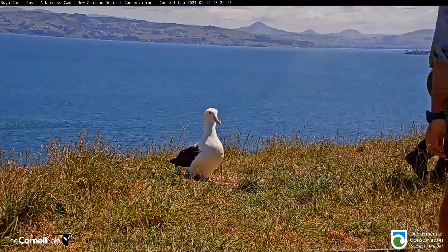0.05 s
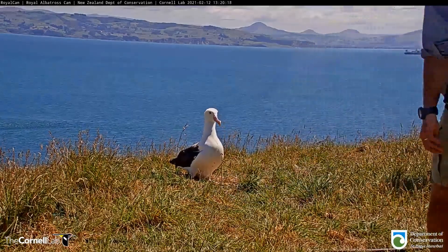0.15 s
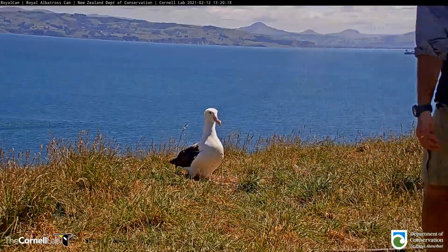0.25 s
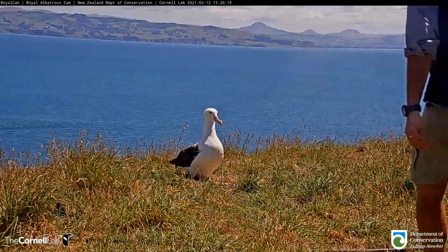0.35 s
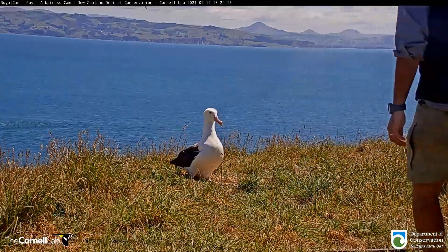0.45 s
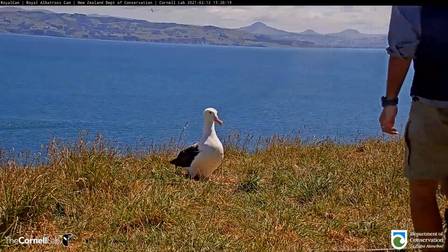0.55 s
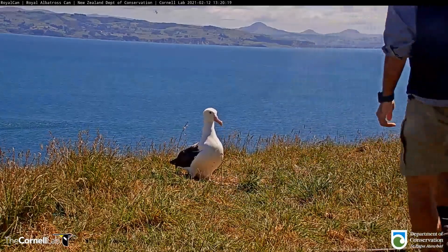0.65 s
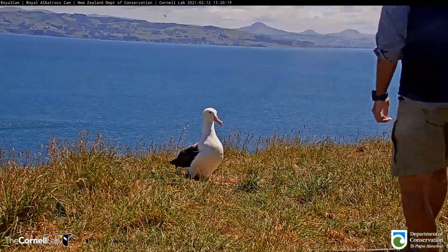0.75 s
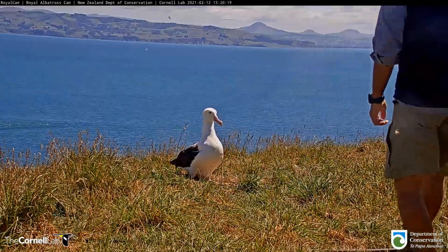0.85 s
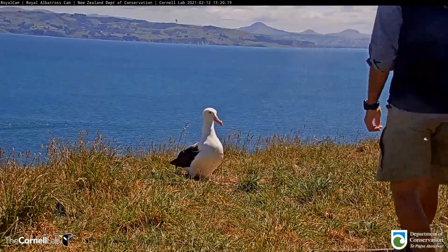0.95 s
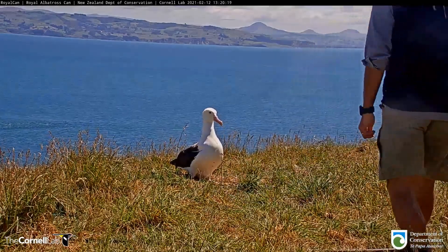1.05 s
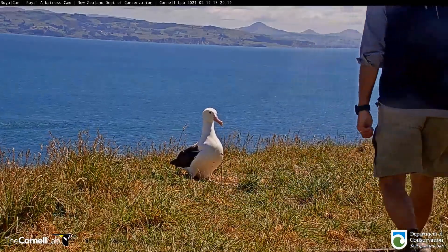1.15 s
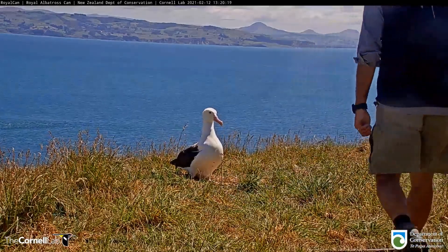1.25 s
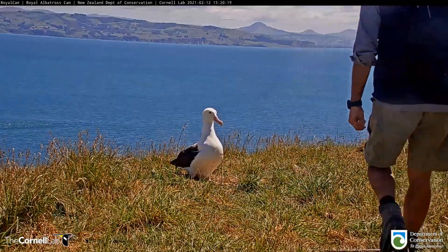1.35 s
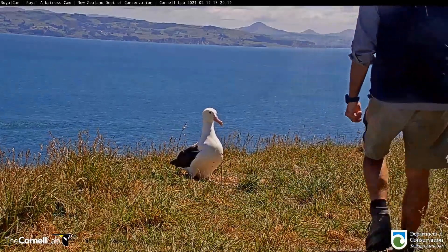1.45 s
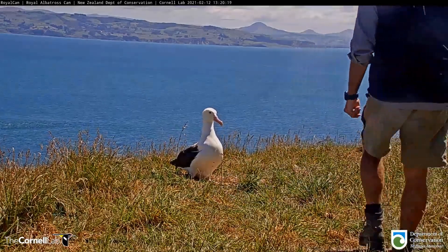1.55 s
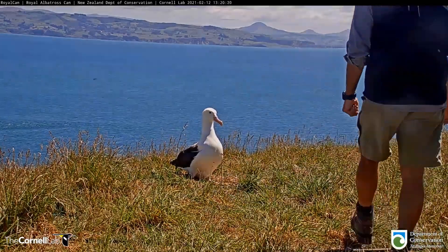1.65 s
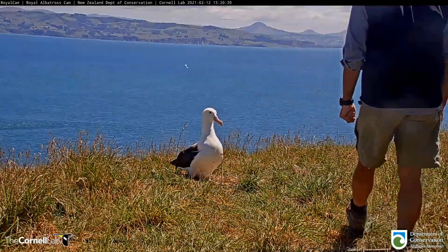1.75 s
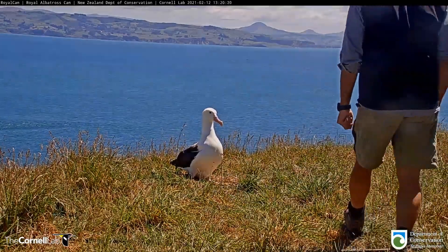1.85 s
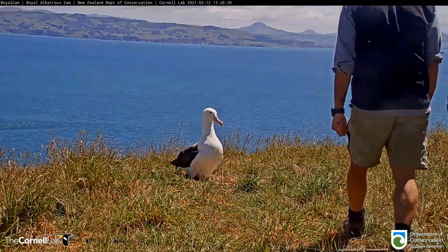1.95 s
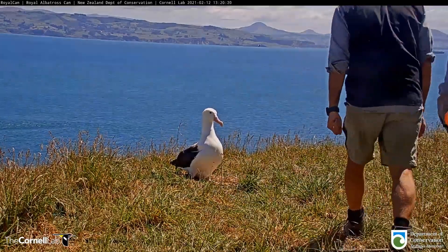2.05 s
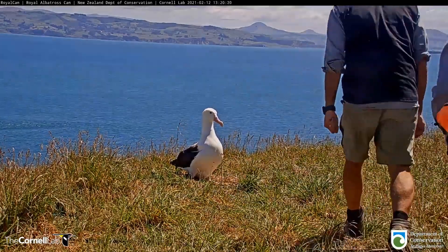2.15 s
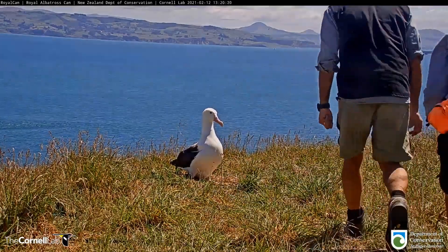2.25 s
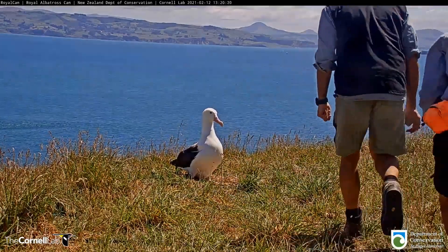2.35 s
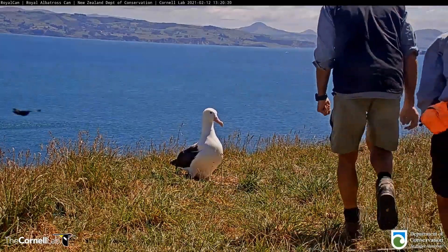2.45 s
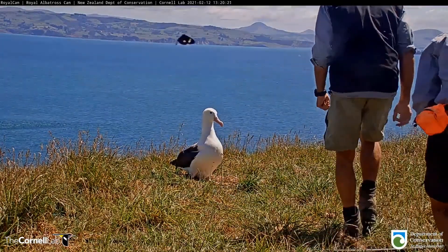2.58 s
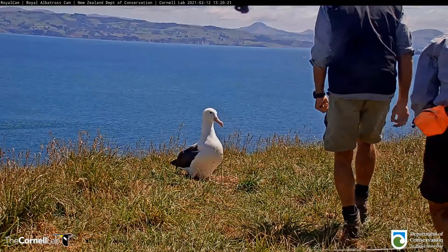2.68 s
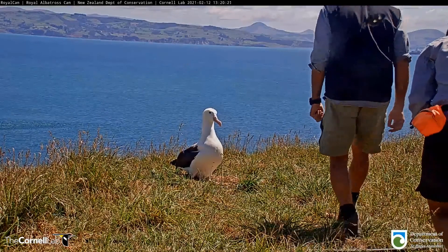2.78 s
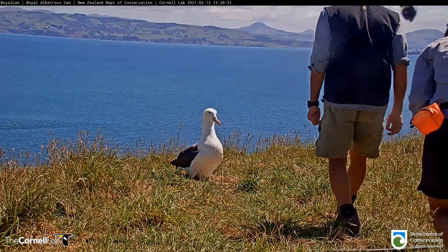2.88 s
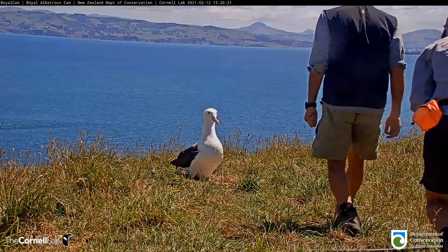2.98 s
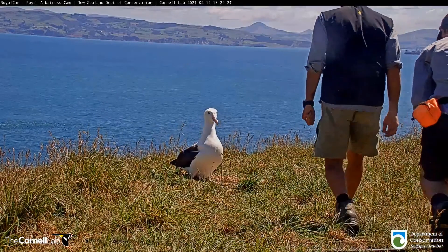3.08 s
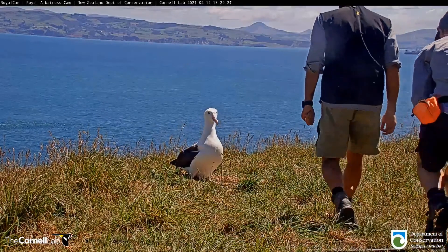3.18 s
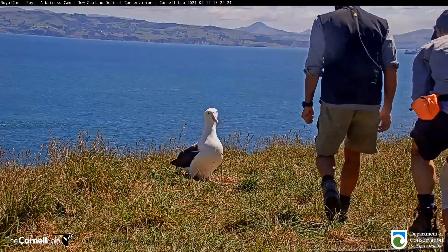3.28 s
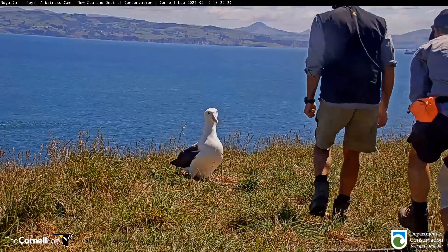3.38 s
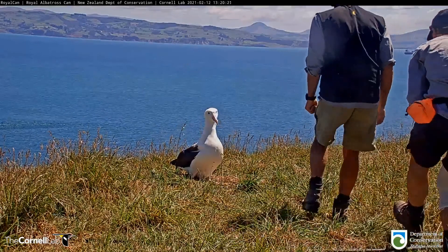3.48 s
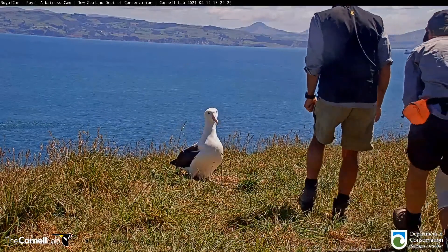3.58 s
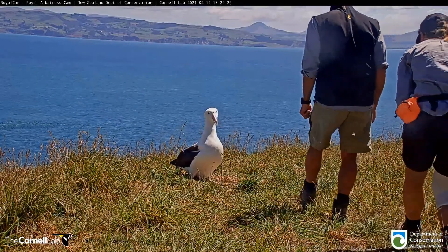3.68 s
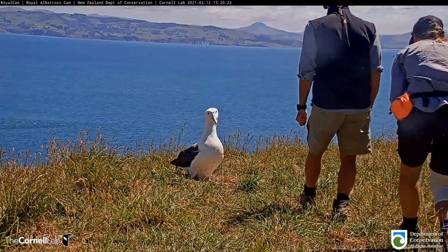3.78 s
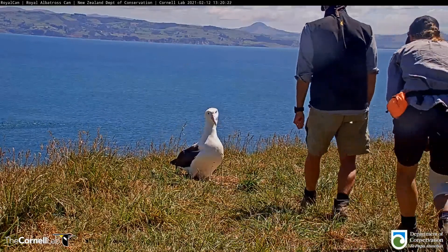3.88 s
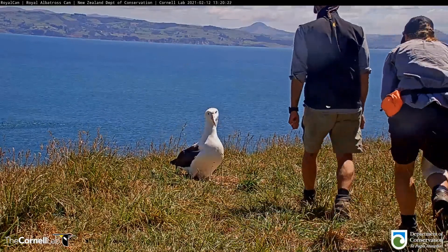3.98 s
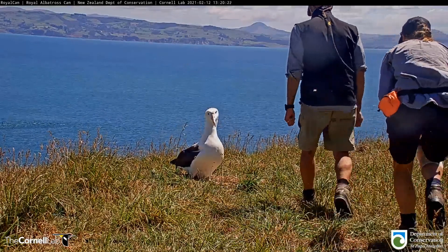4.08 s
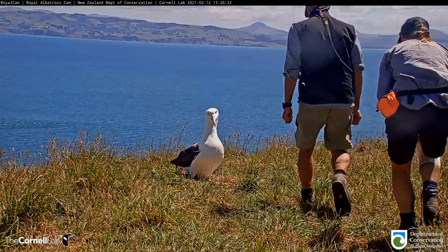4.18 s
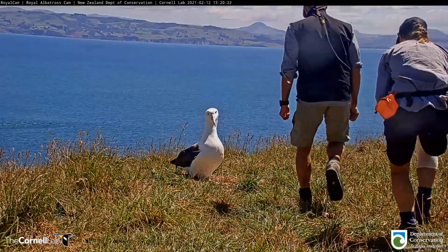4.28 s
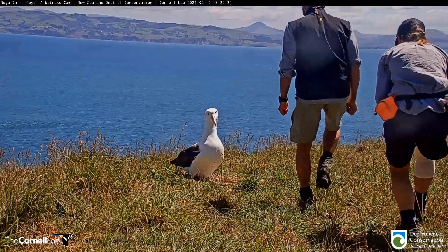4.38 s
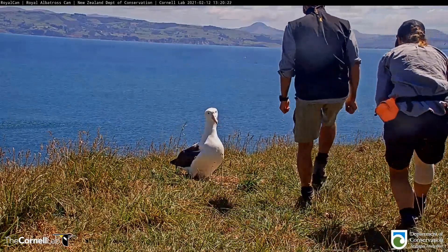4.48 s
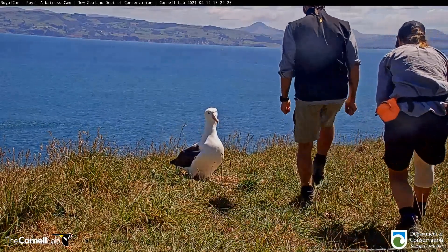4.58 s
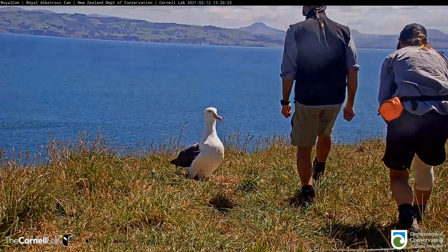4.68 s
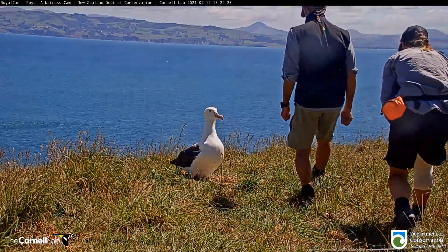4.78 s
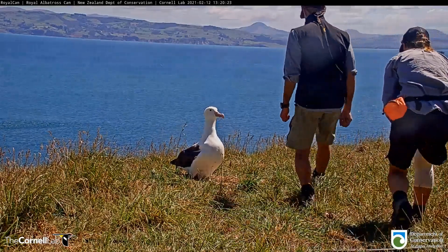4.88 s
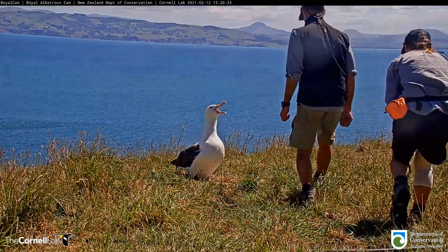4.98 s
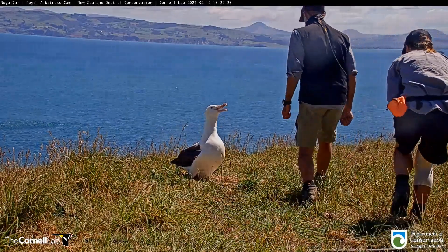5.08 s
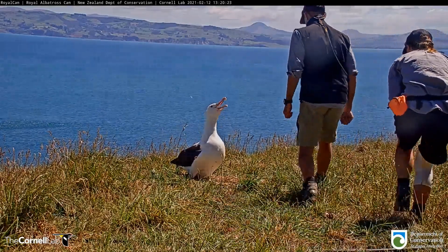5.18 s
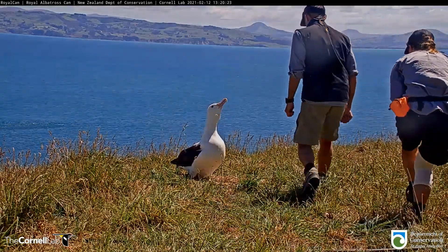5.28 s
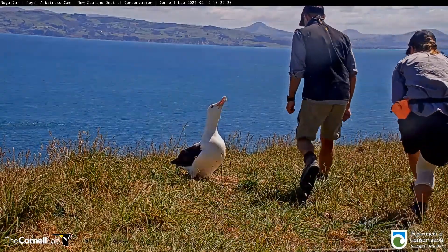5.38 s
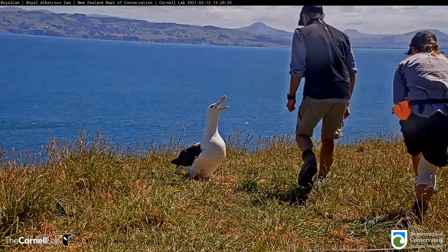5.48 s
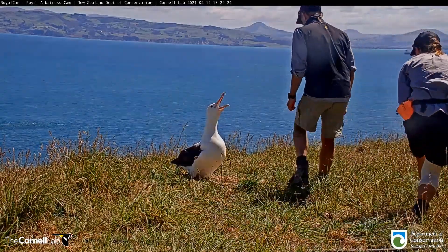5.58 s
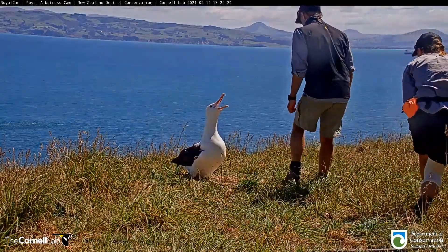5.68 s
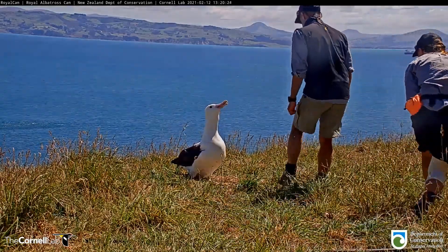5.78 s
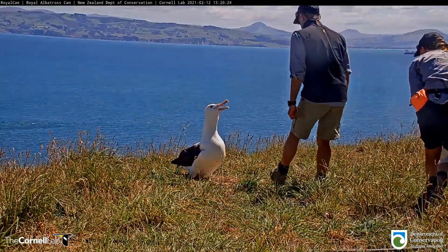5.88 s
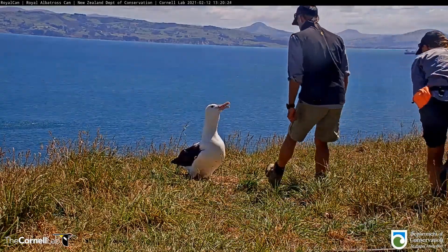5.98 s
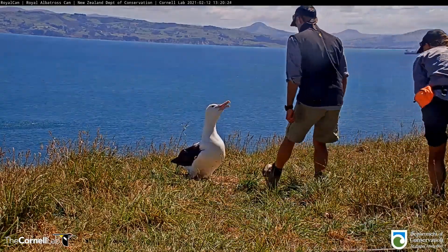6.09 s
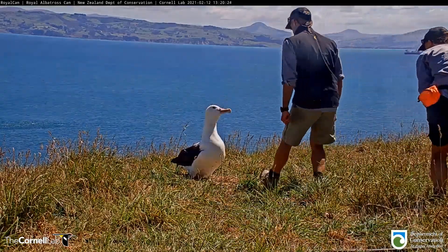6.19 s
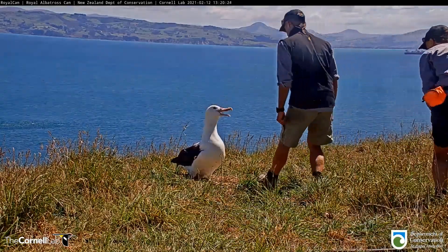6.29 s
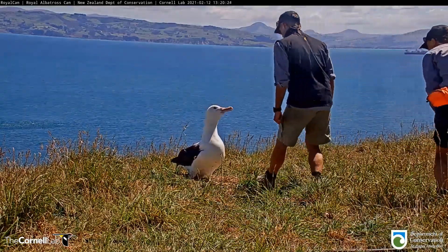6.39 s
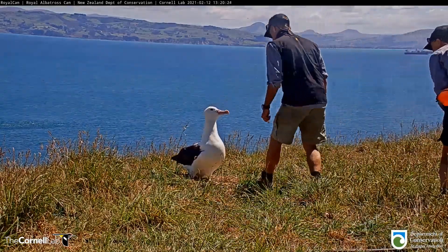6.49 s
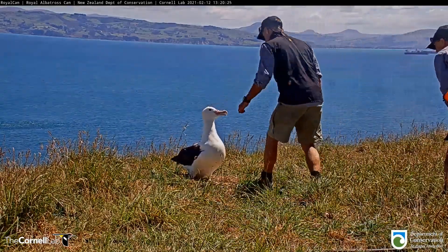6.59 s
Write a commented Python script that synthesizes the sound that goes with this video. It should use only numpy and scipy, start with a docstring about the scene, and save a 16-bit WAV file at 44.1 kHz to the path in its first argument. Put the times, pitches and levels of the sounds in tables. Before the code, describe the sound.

Low wind rumble and faint sea hiss, light grass steps, brief raspy bird cries, then a burst of rapid, woody bill claps with soft throat clucks.

```python
"""Wind and sea (shaped noise) and a faint hum (sines) sound throughout; walkers brush dry grass in noise bursts.
From 1.1 s an albatross on a windy clifftop gives short cries: a shrill tone chopped into a rattle.
From 5.2 s its bill claps in a fast train; each clap rings air and shell modes, the air modes rising in pitch.
From about 5.5 s soft throat clucks, struck damped modes, fall between the claps, and two grunts come late.
The whole passes through a low-pass microphone channel."""
import sys
import numpy as np
from scipy import signal
from scipy.fft import rfft, irfft
from scipy.io import wavfile

SR = 44100
rng = np.random.default_rng(int(sys.argv[2]) if len(sys.argv) > 2 else 0)


def master(y):
    """Save y as 16-bit WAV."""
    cut = np.clip(np.atleast_2d(y).T, -1, 1)
    pcm = np.round(cut * 32767)  # scale
    wavfile.write(sys.argv[1], SR, pcm.astype(np.int16))


N = 292779

# spectrum of the wind rumble: (f/Hz, relative level/dB per Hz)
RUMBLE_SPECTRUM = [(11, -10.5), (18, -4.5), (38, 1.5), (56, 0), (67, -6.5), (73, -22.5), (76, -8),
                   (102, -21.5), (119, -36.5), (193, -41), (240, -54), (310, -88), (530, -120)]
# spectrum of the distant sea: (f/Hz, relative level/dB per Hz)
SEA_SPECTRUM = [(200, -20.5), (260, -24), (380, -5.5), (470, -9), (540, -6), (710, 1), (830, -2),
                (1000, -5.5), (1250, -6), (1500, -12)]
# spectrum of the breeze in the grass: (f/Hz, relative level/dB per Hz)
GRASS_SPECTRUM = [(1300, -26.5), (1550, -4), (1780, 3), (2100, -3.5), (2450, -6), (2920, -2.5),
                  (3300, -3.5), (3900, -8), (4450, -3.5), (5200, -17), (6500, -20), (7200, -25)]
RUMBLE_DB, SEA_DB, GRASS_DB = -39.5, -55.5, -53  # the last two before their swell
# steady hum and whine at the microphone: (mean f/Hz, rms level/dB)
HUM_TONES = [(469, -60.5), (2810, -67.5), (2940, -64.5)]

# boots in dry grass: (t/s, level before the envelope/dB, decay constant/s, centre f/Hz)
GRASS_STEPS = [(0.364, -35, 0.003, 2530), (1.548, -37.5, 0.0037, 2970), (1.728, -41.5, .006, 2000),
               (1.778, -32.5, 0.0025, 2160), (2.017, -39, 0.0032, 4200), (2.051, -55.5, 0.13, 4500),
               (2.804, -56, .2, 3840), (2.947, -52, 0.091, 3380), (6.31, -36, 0.0091, 1650)]

# cries: (t/s, length/s, nominal full rattle rate/Hz, nominal top pitch f/Hz, final pitch drop/share,
#   nominal peak level/dB, roughness while clear/0-1, roughness while broken/0-1, overtone boost/dB)
CRY_GESTURES = [(1.127, 0.21, 83.4, 1151, 0.39, -23.5, 0.28, 0.95, 1),
                (3.8319, .25, 81.7, 1167, 0.27, -25.5, .14, 0.29, 1.5),
                (5.3334, .261, 86.6, 1162, .22, -26.5, .3, .75, 1),
                (5.964, 0.068, 68, 1400, 0.044, -40, .3, .45, -8)]
# partials around the strong second partial: (multiple of the pitch/1, level before the boost/dB)
CRY_PARTIALS = [(1, -33.5), (3, -18.5), (4, -27.5), (5, -45), (6, -47.5)]
# half partials that grow with roughness: (multiple of the pitch/1, level before boost and roughness/dB)
CRY_HALF_PARTIALS = [(1.5, -24.5), (2.5, -10.5), (3.5, -29.5)]
# throat colour of the rasp, bill nearly shut: (f/Hz, relative level/dB)
RASP_BILL_SHUT = [(800, -16.5), (1050, -25), (1280, -1), (1480, -6.5), (1900, 1), (2300, 2.5), (2560, -22),
                  (2900, 2), (3450, -16), (3950, -2), (4480, -19.5), (4850, -17), (5400, -21.5),
                  (7000, -49)]
# throat colour of the rasp, bill wide open: (f/Hz, relative level/dB)
RASP_BILL_OPEN = [(800, -26), (1250, -4.5), (1800, 3.5), (2350, 6.5), (2600, 0.5), (2900, 5.5),
                  (3300, -15.5), (3650, -25.5), (4050, 2), (4450, 3.5), (4900, -22.5), (5400, -23.5),
                  (5800, -15), (7000, -41.5)]
BILL_OPENS_S = 4.9
# a cry gets up to speed: time constant, shares by which rate and pitch start low
SPIN_UP_S, RATE_START, PITCH_START = .03, 0.25, .05
# then runs out of air: share the rate loses, and powers of progress by which rate and pitch sag
RATE_DROP, RATE_SAG_POWER, PITCH_SAG_POWER = .45, 3.5, 3
# level course: attack time constant and depth, slow fade, release time and depth
ATTACK_S, ATTACK_DB, FADE_DB, RELEASE_S, RELEASE_DB = .012, -13, -6.5, 0.05, -17
# break into rasp: start and end (shares of the length) and transition time
BREAK_FROM, BREAK_TO, BREAK_S = .18, .79, .035
# level loss and overtone boost, in dB per unit of roughness added by the break
BREAK_LOSS_DB, BREAK_BOOST_DB = -6, 9.5
# the weakly blown start and end are hoarse: added roughness
HOARSE_START, HOARSE_END = .55, 0.57

# bill claps: (t/s, level/dB, nominal main cavity f/Hz, nominal upper cavity f/Hz,
#   upper cavity level relative to main/dB)
BILL_CLAPS = [(5.2099, -8, 1480, 1660, 2), (5.367, -5.5, 1412, 1720, -11.5),
              (5.4844, -6.5, 1290, 1760, -1.5), (5.59, -8, 1300, 1680, -0.5),
              (5.7041, -7.5, 1307, 1653, -4), (5.8140, -8, 1298, 1670, -5),
              (5.9170, -7.5, 1330, 1730, -7.5), (6.0357, -8, 1343, 1690, -8), (6.144, -9.5, 1390, 1660, -8),
              (6.2602, -9.5, 1435, 1650, -9), (6.4619, -25, 1540, 1850, -17)]
# modes of the horny bill and the throat behind it: (f before scatter/Hz, relative level/dB, t60/s)
BILL_MODES = [(425, -14.5, 0.047), (918, 3, 0.0064), (1923, 3.6, 0.0065), (2770, -6, 0.043),
              (3100, -10.5, 0.0079), (3485, -11.5, 0.03), (3760, -20.5, 0.028), (4570, -14, 0.02),
              (5030, -21.5, 0.025), (6270, -29, 0.025)]
SHELL_DB, REBOUND = -0.5, 0.12  # shell relative to the air modes; share of each clap that rebounds

# modes of the throat: (multiple of the throat f before scatter/1, relative level/dB, t60/s)
THROAT_MODES = [(.68, -12.5, 0.041), (1.001, 0.5, 0.031), (2.17, -3, 0.022), (2.901, -10.5, .015),
                (3.701, -7.5, 0.019)]
CLUCKS_FROM_S, CLUCKS_TO_S = 5.55, 6.3  # claps within these times have clucks ahead of them
# last cluck's mean lead on the clap, mean spacing, timing scatter
CLUCK_LEAD_S, CLUCK_GAP_S, CLUCK_JITTER_S = .018, .015, .002
# mean level of the last cluck, step to each earlier one, throat frequency before scatter
CLUCK_DB, CLUCK_STEP_DB, CLUCK_HZ = -29, -3.5, 720
# grunts: (t/s, level of the first pulse/dB, throat f before scatter/Hz)
THROAT_GRUNTS = [(6.360, -38, 720), (6.469, -22.5, 732)]
GRUNT_GAP_S, GRUNT_STEP_DB = .006, -3.5  # pulse spacing, step to each later pulse

TOP_HZ = 6900  # edge of the microphone channel


def undb(db):
    """Amplitude gain is ten to the power of the level over twenty."""
    return 10 ** (np.asarray(db) / 20)


def unit(x):
    """Power normalisation: scale to rms 1."""
    return x / np.sqrt(np.mean(x ** 2))


def add(out, s, x):
    """Linear superposition: mix x into out from time s."""
    i = int(s * SR)
    out[i:i + len(x)] += x[:max(len(out) - i, 0)]


def walk(rate, size):
    """Random modulation: interpolate normal values drawn at the given rate in Hz; spread near 1."""
    knots = np.arange(size) * rate / SR
    return np.interp(knots, np.arange(size), rng.standard_normal(size))


def colour(x, points):
    """Spectral shaping: impose a (Hz, dB) curve with steep skirts beyond its ends; rms 1."""
    hz, db = np.transpose(points)
    f = np.maximum(np.fft.rfftfreq(len(x), 1 / SR), 1)
    skirts = np.minimum(1, np.minimum(f / hz[0], hz[-1] / f)) ** 8
    curve = undb(np.interp(np.log(f), np.log(hz), db))
    return unit(irfft(rfft(x) * skirts * curve, len(x)))


def noise(points, size):
    """Filtered white noise: a random source takes the given spectrum; rms 1."""
    return colour(rng.standard_normal(size), points)


def ring(t, hz, t60):
    """Damped resonance: one struck mode decays exponentially while its frequency may move."""
    step = (hz + 0 * t) / SR
    cycles = np.cumsum(step) - step
    return np.cos(2 * np.pi * cycles) * np.exp(-np.log(1000) * t / t60)


def wind():
    """Turbulent pressure: air buffets the microphone as low noise of fluctuating level."""
    buffet_db = 1.5 * walk(7, N)
    return unit(noise(RUMBLE_SPECTRUM, N) * undb(buffet_db)) * undb(RUMBLE_DB)


def sea():
    """Broadband radiation: the distant sea is shaped noise that swells gently."""
    swell_db = .4 * walk(2, N)
    return noise(SEA_SPECTRUM, N) * undb(SEA_DB + swell_db)


def grass_hiss():
    """Flow noise: the breeze in the grass is a higher noise band that swells gently."""
    breeze_db = .5 * walk(3, N)
    return noise(GRASS_SPECTRUM, N) * undb(GRASS_DB + breeze_db)


def hum(waver=0.001027):
    """Frequency modulation: thin steady tones waver slightly about their means."""
    out = np.zeros(N)
    for hz, db in HUM_TONES:
        cycles = np.cumsum(hz * (1 + waver * walk(12, N))) / SR
        out += undb(db) * unit(np.sin(2 * np.pi * cycles))
    return out


def steps(grain_db=4):
    """Friction and fracture: stalks snap and brush in short grainy noise bursts."""
    out, t = np.zeros(N), np.arange(SR) / SR
    for s, db, decay_s, hz in GRASS_STEPS:
        band = [(hz / 10, -14), (hz / 2, -6), (hz, 0), (hz * 2, -14)]
        grains = unit(noise(band, SR) * undb(grain_db * walk(660, SR)))
        envelope = np.exp(-t / decay_s) * (1 - np.exp(-10 * t / decay_s))
        add(out, s, undb(db) * grains * envelope)
    return out


def gesture(length, full_rate, top_hz, drop, peak_db, clear_rough, broken_rough, bright_db):
    """Breath control: rattle and pitch climb, the tone breaks midway, and all sags as the air runs out."""
    t = np.arange(0, length, 1 / SR)
    progress, slack = t / length, np.exp(-t / SPIN_UP_S)
    rate = full_rate * (1 - RATE_START * slack - RATE_DROP * progress ** RATE_SAG_POWER)
    hz = top_hz * (1 - PITCH_START * slack - drop * progress ** PITCH_SAG_POWER)
    since_break, until_clear = t - BREAK_FROM * length, BREAK_TO * length - t
    forced = np.clip(np.minimum(since_break, until_clear) / BREAK_S, 0, 1)
    broken = forced * (broken_rough - clear_rough)
    attack, release = np.exp(-t / ATTACK_S), np.clip(1 - (length - t) / RELEASE_S, 0, 1)
    db = peak_db + ATTACK_DB * attack + FADE_DB * progress
    db = db + RELEASE_DB * release + BREAK_LOSS_DB * broken
    rough = np.clip(clear_rough + broken + HOARSE_START * attack + HOARSE_END * release, 0, 1)
    return t, rate, hz, db, rough, bright_db + BREAK_BOOST_DB * broken


def cry(shape, throat, arch=.085, rise=.065, jitter=0.0036, rough_jitter=.06, gap_db=-20,
        sharpness=1.41, lean=.9, scatter_db=2.0, rasp_db=0, crackle_db=3, air_db=-1):
    """Pulsed phonation: a tone gated at the rattle rate, each pulse bending in pitch, mixes with rasp."""
    t, rate, hz, db, rough, boost_db = gesture(*shape)
    size = len(t)
    pulse = np.cumsum(rate) / SR % 1
    opening = np.sin(np.pi * pulse ** lean)
    pitch_jitter = (jitter + rough_jitter * rough) * walk(900, SR)[:size]
    bend = 1 + arch * (opening - np.pi / 4) + rise * (pulse - .5) + pitch_jitter
    cycles = np.cumsum(hz * bend) / SR
    overtones = sum(undb(d) * np.sin(2 * np.pi * k * cycles) for k, d in CRY_PARTIALS)
    halves = rough * sum(undb(d) * np.sin(2 * np.pi * k * cycles) for k, d in CRY_HALF_PARTIALS)
    second_partial = np.sin(2 * np.pi * 2 * cycles)
    tone = unit(second_partial + undb(boost_db) * (overtones + halves))
    # the membranes slap unevenly on every second cycle; slaps and rushing air ring the throat
    slaps = unit(np.diff(cycles // 2, prepend=0) * undb(crackle_db * walk(900, SR)[:size]))
    rushing_air = undb(air_db) * rng.standard_normal(size)
    rasp = undb(rasp_db) * colour(slaps + rushing_air, throat)
    gate = unit(undb(gap_db) + np.abs(opening) ** sharpness)
    level = undb(db + scatter_db * walk(80, SR)[:size])
    return level * gate * (np.sqrt(1 - rough ** 2) * tone + rough * rasp)


def cries():
    """Source and filter: three cries and a faint squeak take a throat colour set by the bill opening."""
    out = np.zeros(N)
    for s, *shape in CRY_GESTURES:
        throat = RASP_BILL_OPEN if s > BILL_OPENS_S else RASP_BILL_SHUT
        add(out, s, cry(shape, throat))
    return out


def clap(main_hz, upper_hz, upper_db, glide=0.19, shut_s=0.0084, main_t60=0.033, upper_t60=0.031,
         scatter=0.015, contact_s=0.00062, crack_db=-19, crack_s=0.0031, seat=0.68, rolloff_hz=4900):
    """Impact and cavity resonance: a crack, shell modes, and two air modes rising as the cavity closes."""
    t = np.arange(int(SR / 10)) / SR
    # air modes start a quarter of the glide below nominal and end three quarters above
    closing = 1 + glide * (1 - np.exp(-t / shut_s) - 1 / 4)
    air = ring(t, main_hz * closing, main_t60)
    air = air + undb(upper_db) * ring(t, upper_hz * closing, upper_t60)
    detune = 1 + scatter * rng.standard_normal(len(BILL_MODES))
    shell = sum(undb(db) * ring(t, hz * d, t60) for (hz, db, t60), d in zip(BILL_MODES, detune))
    # the crack swells as the contact runs along the bill
    scrape = t / crack_s * np.exp(1 - t / crack_s)
    crack_noise = noise([(600, -9), (2700, 7.5), (4600, -10), (6800, -13.0)], len(t))
    crack = undb(crack_db) * scrape ** 2 * crack_noise
    contact = 1 - np.exp(-t / contact_s)
    snap = (air + undb(SHELL_DB) * (shell + crack)) * contact
    # the long edges seat and rebound within three milliseconds
    seated = np.interp(t - .0016, t, snap, left=0)
    rebounded = np.interp(t - .00288, t, snap, left=0)
    snap = snap + seat * seated + REBOUND * rebounded
    # horn radiates little bass; the clap's top is rolled off
    snap = signal.sosfilt(signal.butter(4, 350, "high", fs=SR, output="sos"), snap)
    return signal.sosfilt(signal.butter(4, rolloff_hz, fs=SR, output="sos"), snap)


def claps():
    """Repeated impact: the mandibles meet in a fast train."""
    out = np.zeros(N)
    for s, db, main_hz, upper_hz, upper_db in BILL_CLAPS:
        add(out, s, undb(db) * clap(main_hz, upper_hz, upper_db))
    return out


def cluck(throat_hz, soft_s=0.0022, scatter=0.048):
    """Modal excitation: a soft pulse rings the throat, whose shape changes from one to the next."""
    t = np.arange(int(SR / 10)) / SR
    mode_bases = throat_hz * (1 + scatter * rng.standard_normal(len(THROAT_MODES)))
    pulse = sum(undb(d) * ring(t, k * hz, t60) for (k, d, t60), hz in zip(THROAT_MODES, mode_bases))
    return pulse * 2 * (1 - np.exp(-t / soft_s)) ** 2


def throat_sounds(count=3, scatter_db=2.5):
    """Pulse trains: clucks swell as the bill reopens before a clap; grunts are quick fading runs."""
    out = np.zeros(N)
    for s, *_ in BILL_CLAPS:
        if CLUCKS_FROM_S < s < CLUCKS_TO_S:
            # k counts backwards from the cluck nearest the clap
            for k, (late, loud) in enumerate(rng.standard_normal((count, 2))):
                lead = CLUCK_LEAD_S + k * CLUCK_GAP_S - CLUCK_JITTER_S * late
                db = CLUCK_DB + k * CLUCK_STEP_DB + scatter_db * loud
                add(out, s - lead, undb(db) * cluck(CLUCK_HZ))
    for s, db, throat_hz in THROAT_GRUNTS:
        for k in range(count):
            add(out, s + k * GRUNT_GAP_S, undb(db + k * GRUNT_STEP_DB) * cluck(throat_hz))
    return out


def scene():
    """Superposition: weather, hum, walkers and bird add in the open air."""
    background = wind() + sea() + grass_hiss() + hum()
    bird = cries() + claps() + throat_sounds()
    return (background + steps() + bird)[None]


def record(dry):
    """Band limitation: the microphone channel is a steep elliptic low-pass."""
    return signal.sosfilt(signal.ellip(8, .2, 70, TOP_HZ, fs=SR, output="sos"), dry)


dry = scene()
out = record(dry)
master(out)
```